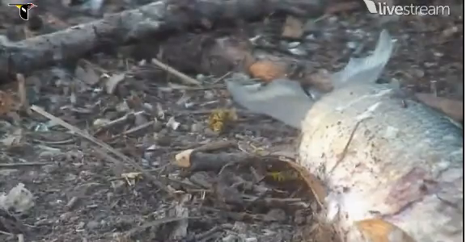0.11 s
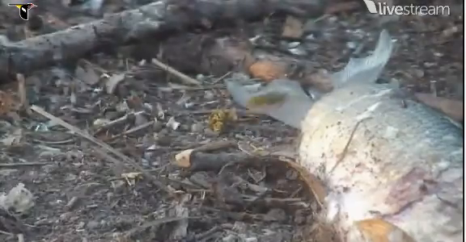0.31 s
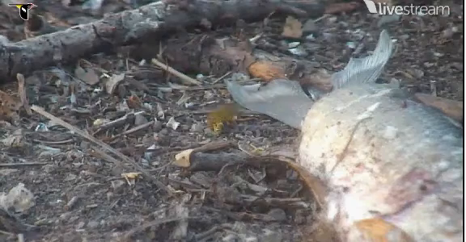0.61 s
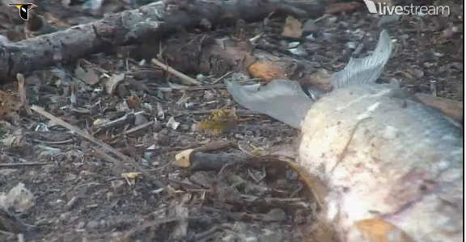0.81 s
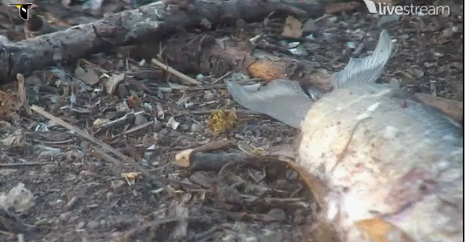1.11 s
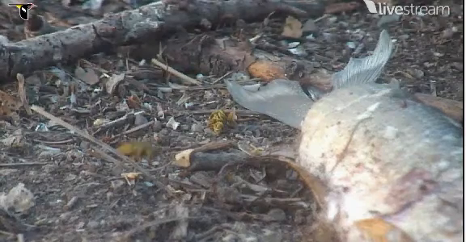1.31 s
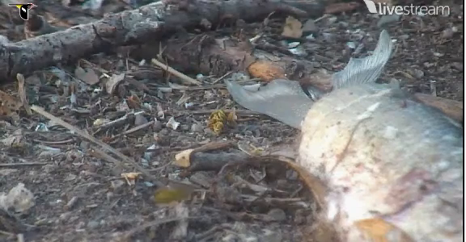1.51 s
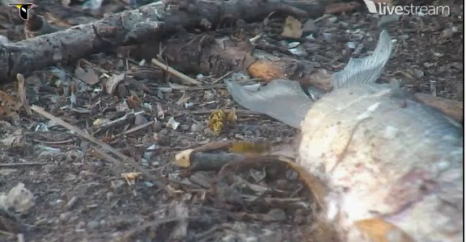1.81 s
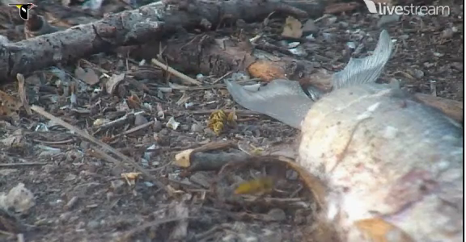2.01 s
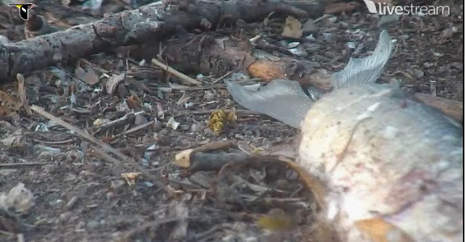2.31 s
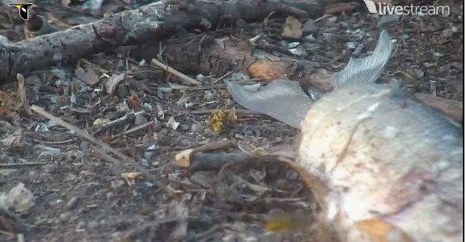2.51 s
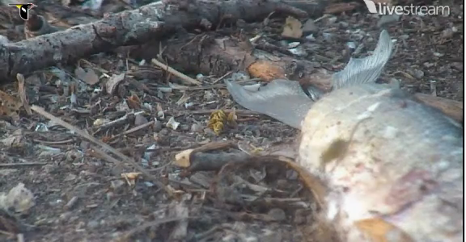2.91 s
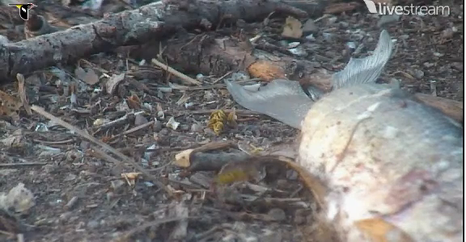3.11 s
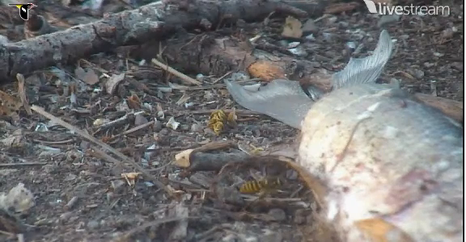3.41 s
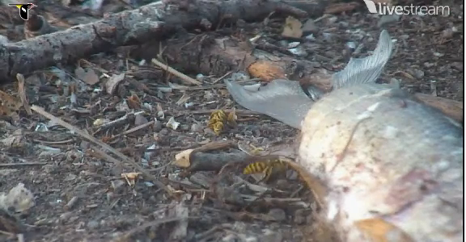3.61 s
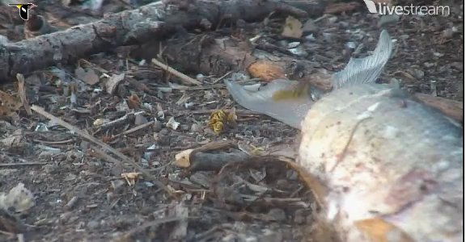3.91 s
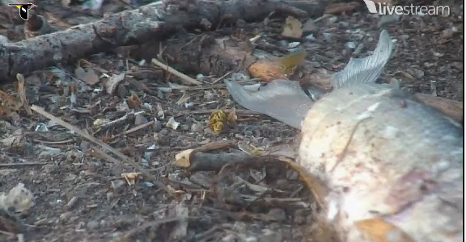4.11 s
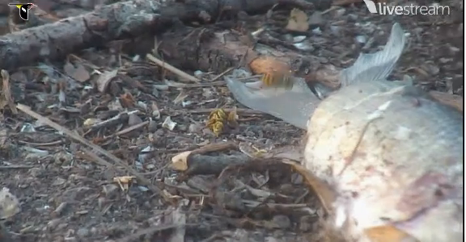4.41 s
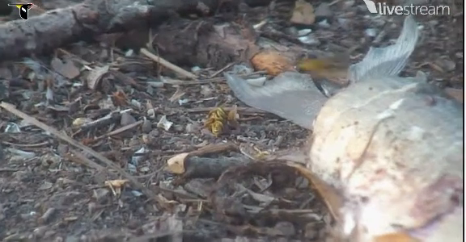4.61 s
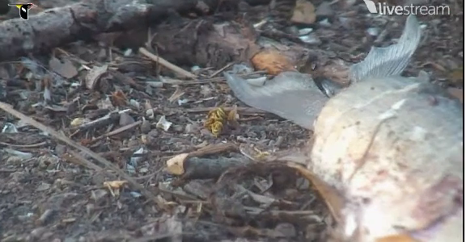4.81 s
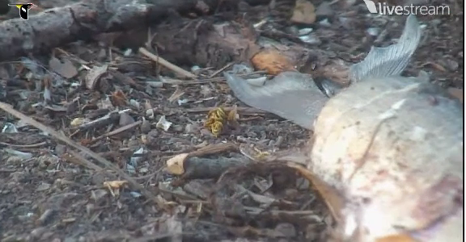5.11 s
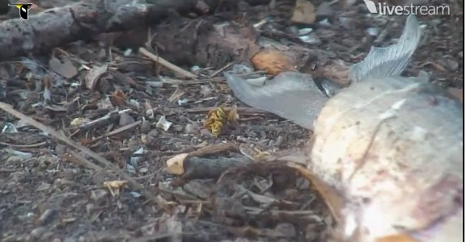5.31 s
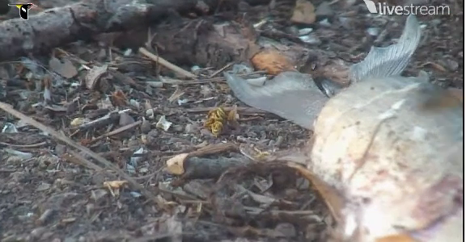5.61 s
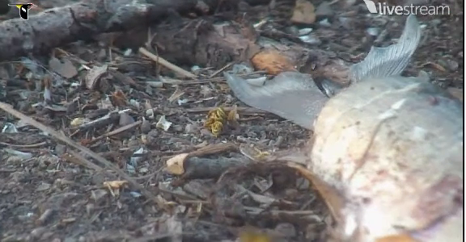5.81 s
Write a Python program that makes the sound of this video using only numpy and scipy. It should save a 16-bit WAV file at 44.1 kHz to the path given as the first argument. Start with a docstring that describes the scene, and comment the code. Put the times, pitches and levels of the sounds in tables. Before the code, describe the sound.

A close, fixed microphone at a nest picks up one raptor calling: two thin rising whistles, a gap filled only by low distant rushing, then ten calls. The first swells in softly and breaks briefly; most others start with a tiny tick and scoop, arch in pitch and sag sharply. Light rasp roughens them, and trees return dull repeats and a faint bright tail. No insect buzz or movement is heard.

```python
"""An osprey calls at its nest: two whistles, a pause, then a run of ten chirps, over a far rush and mains hum.
Calls open with a tick and a low-register scoop (all but lost on the third), then break into a raspy whistle.
The whistle rises to a held pitch and sags; off that pitch it weakens and its octave flares. Short chirps arch.
The first and third calls end in a drop to the low register; the third cracks just before, as a second voice sounds.
Trees echo every call: trunks as distinct, dull repeats, foliage as a thin, bright tail."""
import sys
import numpy as np
from scipy import signal
from scipy.fft import rfft, irfft, next_fast_len
from scipy.io import wavfile
from scipy.ndimage import map_coordinates

SR = 44100
rng = np.random.default_rng(int(sys.argv[2]) if len(sys.argv) > 2 else 0)


def digitize_waveform(pressure):
    """Quantize a signal to 16-bit integers and store it at the path in sys.argv[1].

    Rows of a 2-D input are taken as channels; values are limited to [-1, 1].
    """
    field = np.atleast_2d(pressure).T
    bounded = np.clip(field, -1, 1)
    quanta = np.round(bounded * 32767).astype(np.int16)
    wavfile.write(sys.argv[1], SR, quanta)


N = 261072

# Calls: start_s, end_s, held pitch first_hz, middle_hz, last_hz, level first_db, middle_db, last_db,
# attack_s, octave_db (re whistle), octave flare_db, rasp_db, scoop_db
CALLS = [ (0.055, 0.269, 3254, 3320, 3435, -19.5, -22.5, -17.5, 0.0016, -25.5, 2.5, -46, -23.5),
         (0.467, 0.736, 3156, 3280, 3417, -22.5, -22.5, -18, 0.0012, -27, 4.5, -44, -24.5),
         (2.024, 2.264, 2690, 2847, 3267, -16.5, -22.5, -14, 0.067, -24.5, 10, -37.5, -60),
         (2.366, 2.45, 3130, 3155, 3123, -19, -17, -17.5, 0.0014, -26.5, 17.5, -39.5, -22.5),
         (2.542, 2.671, 3160, 3114, 3100, -15.5, -20, -18, 0.0024, -24.5, 16, -40, -21.5),
         (2.766, 2.851, 3156, 3136, 3140, -17.5, -16, -17, .002, -23.5, 14.5, -41, -22.5),
         (2.944, 3.036, 3140, 3126, 3117, -16, -17.5, -17.5, 0.0016, -21, 12, -40.5, -24.5),
         (3.14, 3.272, 3085, 3114, 3175, -18, -15.5, -20.5, 0.0013, -21.5, 13.5, -43.5, -24.5),
         (3.376, 3.465, 3146, 3152, 3154, -16, -17, -18.5, .002, -22.5, 13.5, -41.5, -28),
         (3.577, 3.792, 3136, 3152, 3215, -18.5, -21.5, -18.5, 0.0024, -26, 18, -37, -25.5),
         (4.017, 4.282, 2966, 3129, 3296, -19.5, -22, -15, 0.0017, -24.5, 12.5, -38.5, -30.5),
         (4.422, 4.667, 3108, 3164, 3236, -19.5, -21.5, -18.5, 0.0013, -28, 19, -36.5, -23), ]
# Turbulence shaking the voice: offset_from_whistle_hz, relative_db
RASP_SPECTRUM = [(60, 0), (300, -3), (700, -4), (1100, -10), (1600, -12.5), (2200, -9.5), (2800, -39)]
# Breath noise: frequency_hz, relative_db
HISS_SPECTRUM = [(1500, -31), (2400, -9), (4000, 1.5), (5000, -15.5), (5900, -0.5), (7500, 1.5),
                 (9000, 2.5), (11000, -3), (12700, -14.5), (15500, -14.5)]

RISE_HZ, RISE_S = 240, 0.0365  # start of each whistle: depth under the held pitch, time to reach it
CRACK_S, CRACK_WIDTH_S = 2.225, 0.006  # centre, 1/e half-width


def amp(db):
    """Amplitude ratio of a level in dB."""
    return 10 ** (np.asarray(db) / 20)


def unit(x):
    """x scaled to rms 1."""
    return x / np.sqrt(np.mean(x ** 2) + 1e-20)


def clock():
    """Sample times in seconds."""
    return np.arange(N) / SR


def along(points, hz):
    """Interpolates (Hz, value) points on a log-frequency axis."""
    point_hz, values = np.transpose(points)
    return np.interp(np.log(hz + 1), np.log(point_hz + 1), values)


def filtered(x, response):
    """Multiplies the spectrum of x by a response of frequency."""
    size = next_fast_len(N + SR // 2)
    spectrum = rfft(x, size) * response(np.fft.rfftfreq(size, 1 / SR))
    return irfft(spectrum, size)[..., :N]


def noise(spectrum):
    """Coloured noise of rms 1."""
    return unit(filtered(rng.standard_normal(N), lambda hz: amp(along(spectrum, hz))))


def wobble(knots_per_s):
    """Smooth random curve through normally distributed knots."""
    knots = rng.standard_normal(int(N * knots_per_s / SR) + 4)
    return map_coordinates(knots, [np.arange(N) * knots_per_s / SR])


def cycles(hz):
    """Running phase, in radians, of a moving frequency."""
    return 2 * np.pi * np.cumsum(hz) / SR


def gate(t, start_s, end_s, rise_s, fall_s):
    """Smooth on and off, centred on start and end."""
    opening = np.minimum((t - start_s) / rise_s, (end_s - t) / fall_s) + 0.5
    return np.sin(np.pi / 2 * np.clip(opening, 0, 1)) ** 2


def ramp(t, length_s):
    """Falls from 1 to 0 over length_s."""
    return np.clip(1 - t / length_s, 0, 1)


def crack_pulse(t):
    """Gaussian pulse, peak 1, at the moment the voice cracks."""
    return np.exp(-((t - CRACK_S) / CRACK_WIDTH_S) ** 2)


def whistles(jitter=0.0029, shimmer_db=0.58, flutter_slip=0.65, flutter_octave_db=-23,
             rasp_slip=0.2, hiss_db=-17, spurt_db=1.5):
    """The syrinx whistles; slower flutter and turbulent rasp spread sidebands around each partial."""
    # High partials: multiple, level_db re the steady octave
    overtones = [(3, -15), (4, -14), (5, -17)]
    sag_hz, sag_s = 427, 0.0402  # final fall below the held pitch
    fade_db, fade_hz = 8, 199  # loss off the held pitch; pitch distance for 63 % of it
    flare_hz, flare_width_hz = 183, 164  # octave flare: centre under the held pitch, 1/e half-width
    attack_climb_db = 11
    flutter_hz, flutter_db = 777, -43  # nominal; drift and surge move them
    crack_lift_hz, crack_dip = 430, 0.65  # pitch jump, share of swing lost

    time, voice = clock(), np.zeros(N)
    grit = unit(amp(spurt_db * wobble(160)))  # turbulence comes in spurts
    rasp, slip, hiss = grit * noise(RASP_SPECTRUM), grit * noise(RASP_SPECTRUM), grit * noise(HISS_SPECTRUM)
    waver, shimmer = wobble(250), wobble(110)
    drift, surge = 1 + 0.06 * wobble(120), amp(4.5 * wobble(70) - 2)  # unsteady flutter rate and depth

    for (start_s, end_s, first_hz, middle_hz, last_hz, first_db, middle_db, last_db,
         attack_s, octave_db, flare_db, rasp_db, _) in CALLS:
        now = (time > start_s - 0.01) & (time < end_s + 0.01)
        t = time[now]
        progress = (t - start_s) / (end_s - start_s)

        # Pitch rises to its held line and sags off it; level follows
        under_hz = RISE_HZ * ramp(t - start_s, RISE_S) ** 2 + sag_hz * ramp(end_s - t, sag_s) ** 2
        hz = np.interp(progress, [0, 0.5, 1], [first_hz, middle_hz, last_hz]) - under_hz
        db = np.interp(progress, [0, 0.5, 1], [first_db, middle_db, last_db])
        db -= fade_db * (1 - np.exp(-under_hz / fade_hz))
        db -= attack_climb_db * ramp(t - start_s, attack_s)

        # At the crack the whistle lifts, weakens and dulls
        crack = crack_pulse(t)
        hz += crack_lift_hz * np.exp(-np.abs(t - CRACK_S) / CRACK_WIDTH_S)

        # Above -23 dB a louder whistle is purer: rasp and flutter do not swell with it
        swell_db = np.maximum(db, -23)
        rough = amp(rasp_db - swell_db) * (1 + crack)
        depth = amp(flutter_db - swell_db) * surge[now]
        beat = cycles(flutter_hz * drift[now])

        # Phase and amplitude shake together, favouring the lower sidebands
        phase = cycles(hz * (1 + jitter * waver[now]))
        phase += flutter_slip * depth * np.cos(beat) + rasp_slip * rough * slip[now]
        swing = 1 + depth * np.sin(beat) + rough * rasp[now]
        swing *= amp(shimmer_db * shimmer[now]) * (1 - crack_dip * crack)

        # Octave flares during rise and sag; higher partials stay even
        flare = np.exp(-((under_hz - flare_hz) / flare_width_hz) ** 2)
        edge = amp(octave_db + flare_db * flare) * np.sin(2 * phase)
        for multiple, level_db in overtones:
            edge += amp(octave_db + level_db) * np.sin(round(multiple) * phase)
        edge += depth * amp(flutter_octave_db) * np.cos(2 * phase - beat)

        tone = np.sqrt(2) * swing * (np.sin(phase) + (1 - crack / 2) * edge)
        breath = rough * amp(hiss_db) * hiss[now]
        voice[now] += amp(db) * gate(t, start_s, end_s, rise_s=0.0015, fall_s=0.016) * (tone + breath)
    return voice


def second_voice(pitch_hz=3800, level_db=-22, octave_db=-27, rasp_db=-24):
    """The other side of the syrinx sounds for an instant and beats against the whistle."""
    t = clock()
    phase = 2 * np.pi * pitch_hz * t + amp(rasp_db) * noise(RASP_SPECTRUM)
    tone = np.sqrt(2) * (np.sin(phase) + amp(octave_db) * np.sin(2 * phase))
    return amp(level_db) * crack_pulse(t) * tone


def scoops(octave_db=-13, third_db=-32, rasp_db=-23, hiss_db=-31, tick_db=-17):
    """The syrinx opens with a tick and glides in its low register, into a call or out of one."""
    # Drops that end a call: start_s, length_s, first_hz, last_hz, level_db
    drops = [(0.26, 0.016, 2710, 2200, -37.5), (2.264, .015, 2580, 2120, -35.5)]
    scoop_s = 0.018
    from_share, to_share = 0.72, 0.85  # scoop pitch re the whistle's first pitch
    arc = 0.83  # share of the swell and fade completed before the break

    time, voice = clock(), np.zeros(N)
    rasp, hiss = noise(RASP_SPECTRUM), noise(HISS_SPECTRUM)
    tick = noise([(1500, -22.0), (2200, 9.0), (4500, -5), (7000, -16), (11000, -30.5)])  # (Hz, dB)

    glides = []
    for start_s, _, held_hz, *_, scoop_db in CALLS:
        whistle_hz = held_hz - RISE_HZ
        glides.append((start_s - scoop_s, scoop_s, from_share * whistle_hz, to_share * whistle_hz, scoop_db))
    glides.extend(drops)

    for start_s, length_s, first_hz, last_hz, level_db in glides:
        now = (time >= start_s) & (time < start_s + length_s)
        t = time[now] - start_s
        progress = t / length_s
        phase = cycles(first_hz + (last_hz - first_hz) * progress ** 1.54)
        tone = np.sin(phase) + amp(octave_db) * np.sin(2 * phase) + amp(third_db) * np.sin(3 * phase)
        swell = np.abs(np.sin(arc * np.pi * progress ** 1.52)) ** 0.54
        opening = amp(tick_db) * np.exp(-t / 0.0044) * tick[now]
        glide = np.sqrt(2) * tone * (1 + amp(rasp_db) * rasp[now]) + amp(hiss_db) * hiss[now]
        glide *= 1 - ramp(length_s - t, 0.001)  # cut short at the end
        voice[now] += amp(level_db) * (opening + swell * glide)
    return voice


def throat(voice):
    """The windpipe's resonances colour the voice."""
    # Windpipe response: frequency_hz, gain_db
    windpipe = [(300, -64.5), (1200, -13.5), (1900, -1.5), (4400, 2.5), (5050, -14), (5600, -0.5),
                (9200, -3.5), (10100, -6.5), (12300, 1.5)]
    return filtered(voice, lambda hz: amp(along(windpipe, hz)))


def trees(call, scatter_db=-27, t60_s=0.92, dull_hz=6200):
    """Trunks return distinct echoes with less treble; nearby foliage adds a thin, bright tail."""
    # Trunk echoes: delay_s, level_db
    echoes = [(.031, -39), (.063, -27), (.128, -40.5), (0.179, -33), (.223, -27), (.39, -45.5)]
    t = np.arange(SR // 2) / SR
    tail = amp(-60 * t / t60_s) * rng.standard_normal(len(t))
    tail /= np.linalg.norm(tail)
    foliage = amp(scatter_db) * signal.fftconvolve(call, tail)[:N]
    trunks = sum(amp(db) * np.pad(call, (round(delay_s * SR), 0))[:N] for delay_s, db in echoes)
    return foliage + filtered(trunks, lambda hz: 1 / (1 + (hz / dull_hz) ** 4))


def placed(call):
    """Splits the call to left and right, nearly mono, by frequency-dependent level differences."""
    # Stereo lean: frequency_hz, left_minus_right_db
    lean = [(3300, 0.17), (4200, .3), (5500, 3.5), (6500, 2), (9800, 2), (12000, 0.7)]
    return filtered(call, lambda hz: amp(np.outer([0.5, -0.5], along(lean, hz))))


def far_rush(air_db=-48.5, rumble_db=-99):
    """Coloured noise: a nearly steady far rush, a thin hiss and a trace of rumble."""
    # Rush spectrum: frequency_hz, relative_db_per_hz
    rush_spectrum = [(53, -78.5), (90, -51), (104, -47.5), (144, -38.5), (177, -29), (209, -26),
                     (232, -17.5), (264, -14.5), (361, -5), (438, -4.5), (561, -1), (838, -0.5),
                     (1100, -10), (1480, -21), (2000, -23.5), (2600, -54.5), (4400, -120)]
    # Hiss spectrum: frequency_hz, relative_db_per_hz
    air_spectrum = [(940, -25), (1600, -7), (1950, -4), (2250, -0.5), (2630, 0.5), (2970, -7.5),
                    (3530, -12.5), (4110, -15), (5740, -28.5), (6810, -40), (8160, -38.5), (8720, -38),
                    (15600, -44.5)]
    # Rush level over time: time_s, level_db
    flow = [(0, -31.5), (1, -32), (3.8, -32.5), (4.3, -33), (4.9, -34), (5.55, -31.5), (5.92, -33.5)]
    rush_db = np.interp(clock(), *np.transpose(flow)) + 0.22 * wobble(12)
    rush = amp(rush_db) * noise(rush_spectrum)
    air = amp(air_db) * noise(air_spectrum)
    rumble = amp(rumble_db) * noise([(20, 1), (100, -0.5), (300, -27.5)])  # (Hz, dB)
    return rush + air + rumble


def mains_hum():
    """Mains harmonics as sines that waver slightly in level and phase."""
    # Harmonics: frequency_hz, mean level_db
    harmonics = [(120, -85.5), (240, -60.5)]
    t, hum = clock(), np.zeros(N)
    for hz, db in harmonics:
        phase = 2 * np.pi * hz * t + 0.28 * wobble(3.3)
        hum += amp(db + wobble(6)) * np.sqrt(2) * np.sin(phase)
    return hum


def scene():
    """The bird and its echoes, treble a little to the left, over a mono background."""
    bird = throat(whistles() + second_voice() + scoops())
    return placed(bird + trees(bird)) + far_rush() + mains_hum()


def record(dry, top_hz=15780):
    """Fades in and out over a few milliseconds and removes everything above the band limit."""
    fade = gate(clock(), 0.002, N / SR - 0.002, rise_s=0.004, fall_s=0.004)
    return filtered(dry * fade, lambda hz: hz < top_hz)


dry = scene()
out = record(dry)
digitize_waveform(out)
```